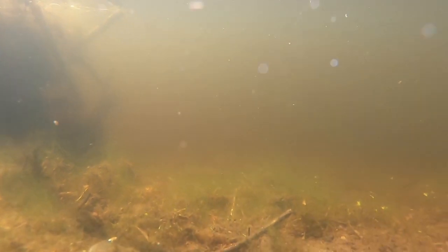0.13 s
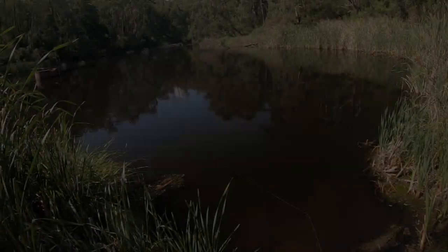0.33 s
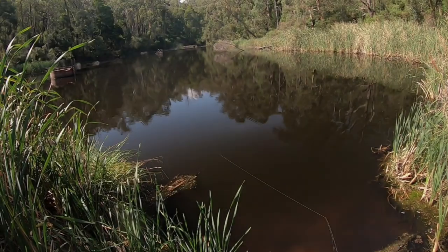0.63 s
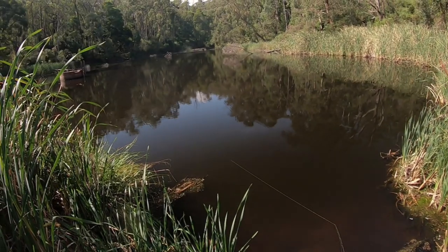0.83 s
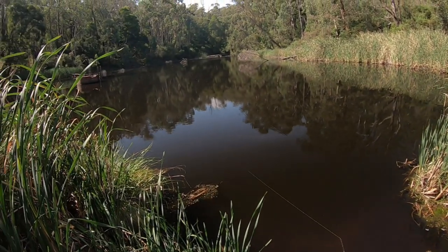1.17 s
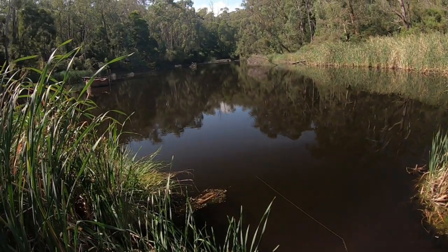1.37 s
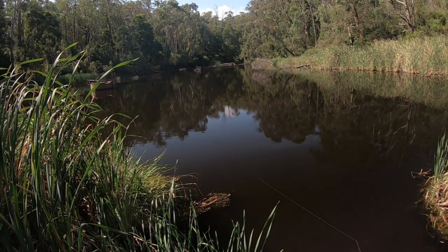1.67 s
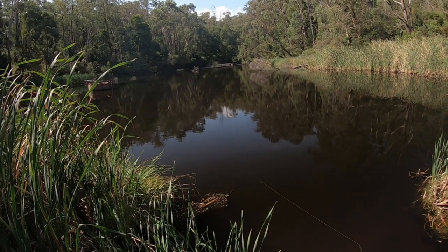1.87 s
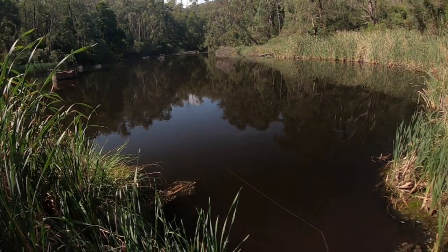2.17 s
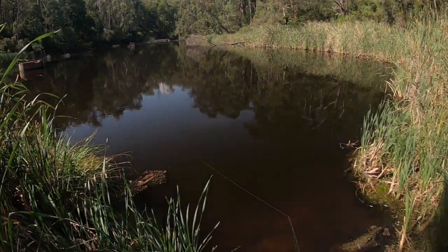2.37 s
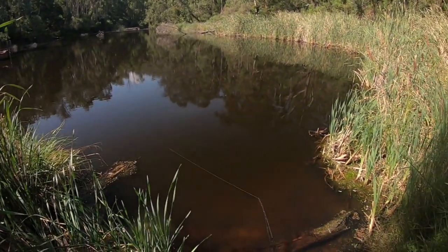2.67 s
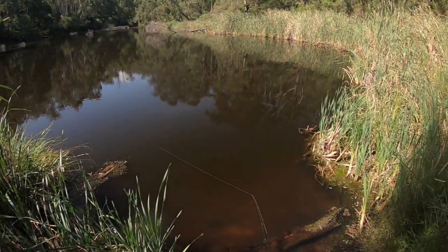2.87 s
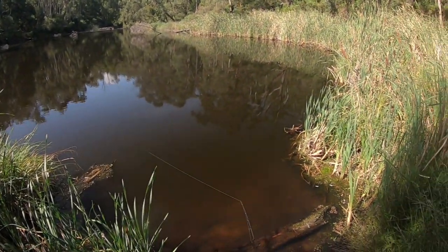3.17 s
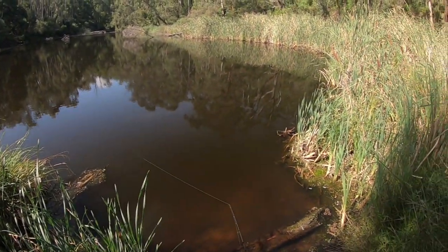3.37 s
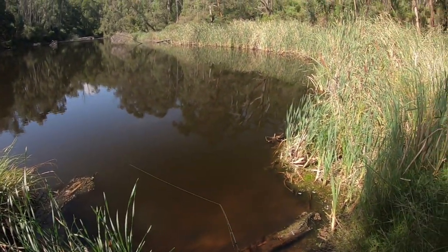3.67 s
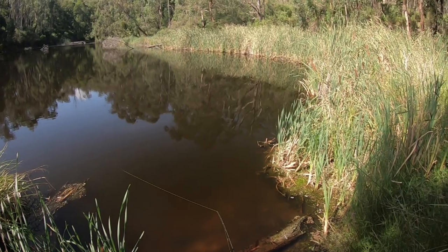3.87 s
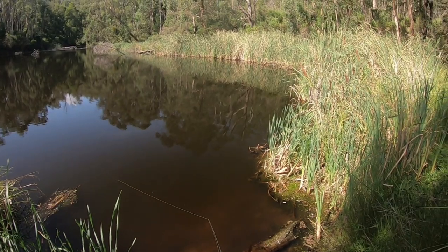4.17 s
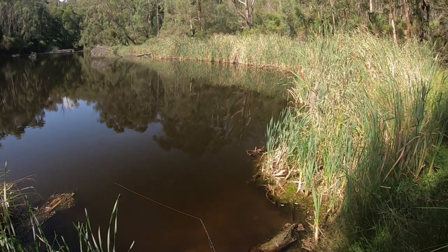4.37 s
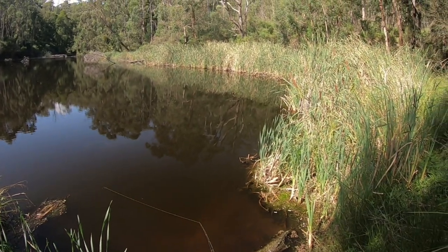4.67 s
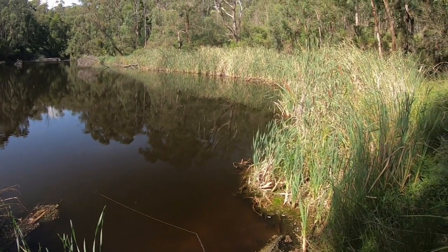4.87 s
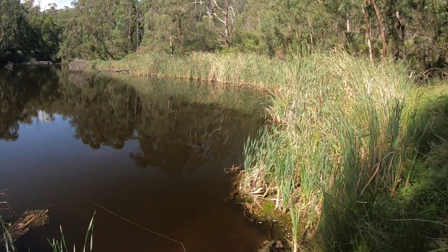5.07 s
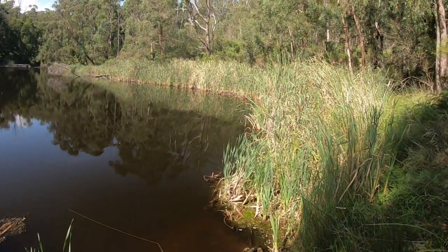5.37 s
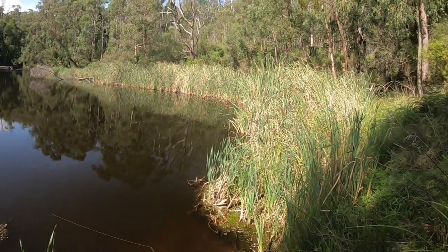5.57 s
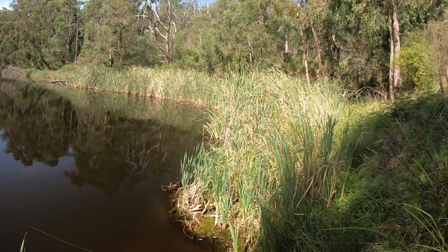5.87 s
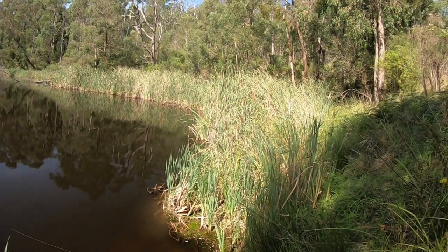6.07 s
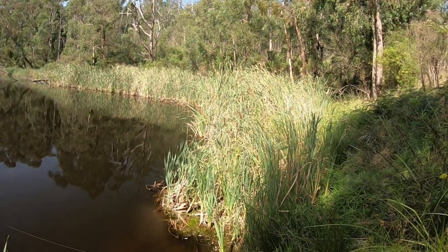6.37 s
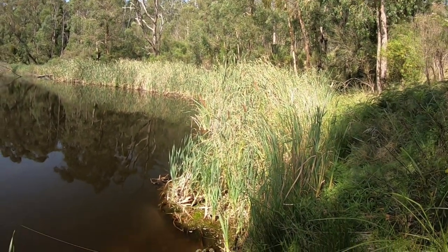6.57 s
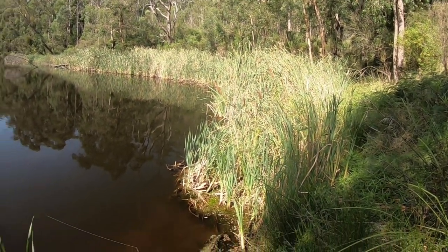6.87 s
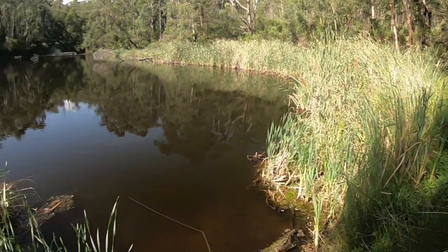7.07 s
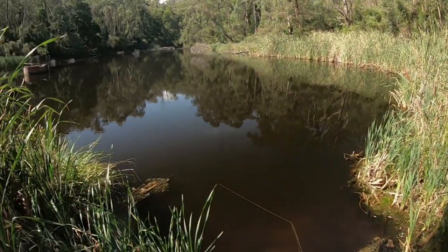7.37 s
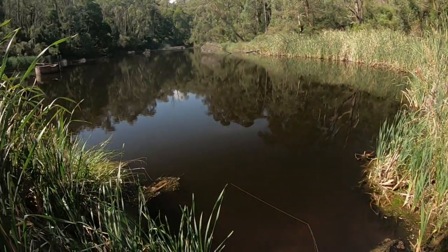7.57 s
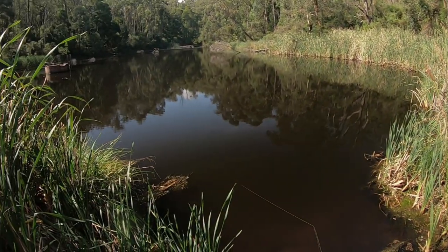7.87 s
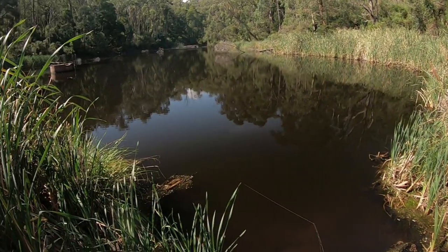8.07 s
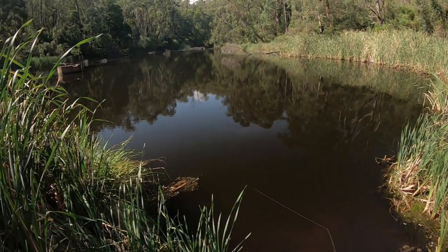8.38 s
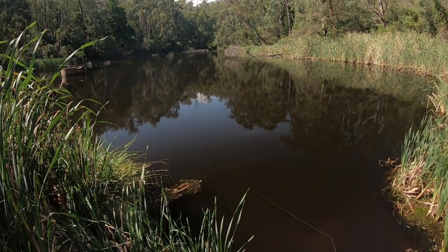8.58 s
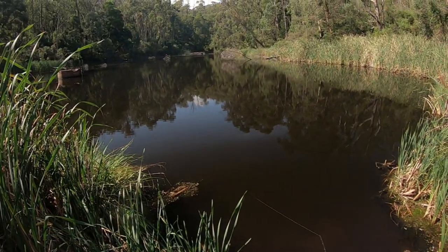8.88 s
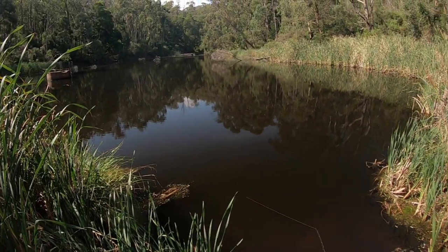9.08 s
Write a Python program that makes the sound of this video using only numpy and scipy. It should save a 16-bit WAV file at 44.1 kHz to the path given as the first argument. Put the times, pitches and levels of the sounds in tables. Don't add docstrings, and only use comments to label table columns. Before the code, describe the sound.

A brief loud underwater rumble with dull knocks cuts off, then a quiet lakeside fades in with cricket trills, small bird chirps and twig snaps.

```python
import sys
import numpy as np
from scipy import signal
from scipy.fft import rfft, irfft, next_fast_len
from scipy.io import wavfile
from scipy.ndimage import uniform_filter1d

SR = 44100
rng = np.random.default_rng(int(sys.argv[2]) if len(sys.argv) > 2 else 0)


def boost_factor(decibels):
    exponent = np.asarray(decibels, float) / 20
    return 10 ** exponent


def wrap_up_sound(samples):
    columns = np.atleast_2d(samples).T
    tamed = np.clip(columns, -1, 1)
    steps = np.round(tamed * 32767).astype(np.int16)
    wavfile.write(sys.argv[1], SR, steps)


N = 406196
T = np.arange(N) / SR

CUT_S, FADE_S = .2195, 0.97
CUT_PRESSURE, START_PRESSURE = -0.019, -0.01
# start_s, level_db
RUMBLE_SWELL = [
    (0, -25),
    (.03, -34),
    (.06, -36),
    (0.099, -34.5),
    (.16, -38.5),
    (.21, -37.5),
]
# pitch_hz, level_db (per Hz)
WATER_COLOUR = [(12, -49), (20, -5.5), (70, -9), (120, -18.5), (190, -18), (263, -32.5), (607, -55.5),
                (828, -68), (1100, -54.5), (1210, -56.5), (6000, -83.5), (7800, -126), (13200, -120)]
# start_s, level_db, pitch_hz, decay_s
THUMPS = [
    (.005, -13, 28, 0.09),
    (0.039, -28, 42, .044),
    (.051, -24.5, 18, 0.33),
    (.117, -26, 68, 0.18),
    (.178, -14.5, 53, 0.061),
]
# start_s, level_db, pitch_hz
KNOCKS = [
    (.0148, -53, 3400),
    (0.0168, -25, 503),
    (0.018, -41, 1500),
    (.0596, -42, 700),
    (.078, -19, 397),
    (.097, -41, 500),
    (.13, -50, 900),
    (.188, -58, 3020),
]
KNOCK_T60_S = 0.0055

# pitch_hz, level_db (per Hz)
CHORUS_COLOUR = [(4000, -41), (5500, -15.5), (6900, -9.5), (7700, -4), (8480, 0.5), (8960, -5.5),
                 (9400, -15), (9900, -22.5), (11700, -27.5), (12200, -58), (17000, -75)]
# start_s, level_db
CHORUS_SWELL = [
    (1.2, -67.5),
    (3.9, -68.5),
    (4.6, -69),
    (7.2, -68.5),
    (8.1, -67.5),
    (9.2, -68.5),
]
CHORUS_PAN_DB = -1.8
# pitch_hz, level_db (per Hz)
AIR_SUM_COLOUR = [(15, -37), (25, -9.5), (49, -14), (111, -17.5), (143, -4), (172, 0.5), (226, -3.5),
                  (341, -10.5), (528, -16.5), (816, -9), (1030, -14.5), (1450, -15), (1750, -19),
                  (2400, -22.5), (3250, -20), (6000, -27), (7800, -57), (13200, -120)]
# pitch_hz, level_db (per Hz)
AIR_DIFFERENCE_COLOUR = [(15, -39), (25, -12.5), (75, -21), (108, -14), (130, -5.5), (157, 0), (392, -10),
                         (579, -10.5), (634, -5), (816, 0), (1000, -8), (1320, -8.5), (2570, -22.5),
                         (4160, -26.5), (6000, -24.5), (7800, -68), (13200, -120)]
AIR_SUM_DB, AIR_DIFFERENCE_DB = -61.5, -59

# third_note_s, last_note_s, level_db, growth_db, pan_db
TRILLS = [
    (.213, 0.624, -70, -3, 7),
    (1.121, 1.554, -72, -3, 13),
    (2.409, 2.845, -67, 3, -2),
    (3.517, 3.951, -62, 1, -5),
    (4.443, 4.81, -62, -2, -2),
    (5.305, 5.732, -59, 0.5, -4),
    (6.224, 6.654, -57, 0, -6),
    (7.206, 7.695, -69, -8, 5),
    (8.181, 8.61, -72, 1, 16),
    (9.103, 9.153, -65, 0, 8),
]
# third_note_s, last_note_s, level_db, growth_db, pan_db
LOW_TRILLS = [
    (7.305, 7.55, -74, 5, -8),
    (7.948, 8.132, -71, 2, -13),
    (8.451, 8.902, -71, -1, -13),
]
TRILL_S, TRILL_HZ, LOW_TRILL_HZ = .062, 7270, 6660

# first_s, last_s, start_level_db, end_level_db, pan_db
FAST_CRICKET = [
    (.326, .72, -62, -62, -2),
    (1.083, 1.33, -65, -65, -3),
    (3.87, 5.117, -65, -61, -3),
    (5.355, 5.907, -63, -61, -8),
    (6.297, 7.313, -62, -67, -9),
]
# first_s, last_s, start_level_db, end_level_db, pan_db
SLOW_CRICKET = [
    (2.367, 3.775, -71, -66.5, 8),
    (3.864, 5.068, -58.5, -58, -8),
    (5.816, 6.276, -62.5, -69, 1),
    (6.368, 7.013, -62, -56.5, -7.5),
    (8.03, 9.14, -62.5, -60, -21),
]
FAST_S, SLOW_S = .0782, .0926
FAST_HZ, SLOW_HZ, EFFORT_HZ_PER_DB = 8880, 9006, 7
RASP_DB_PER_DB = .4

# start_s, length_s, start_hz, end_hz, level_db
FAR_NOTES = [(.87, 0.102, 2000, 2200, -70.5), (1.1, .03, 7150, 7010, -68.5), (1.648, .025, 5350, 4850, -70),
             (4.047, .018, 3750, 3520, -63), (6.69, .03, 5450, 5350, -74), (6.996, .025, 5750, 5680, -72),
             (7.505, .025, 4750, 4550, -69), (7.94, .23, 4600, 5600, -76), (8.069, .025, 3830, 3600, -69),
             (8.83, .06, 5170, 5650, -71), (8.99, .04, 7300, 7100, -67)]
# start_s, length_s, start_hz, end_hz, level_db
LEFT_NOTES = [
    (2.12, .13, 5300, 5300, -83),
    (2.497, .08, 4970, 5090, -84),
    (3.34, .025, 3350, 4300, -71),
    (3.33, .21, 4600, 5600, -76),
    (3.56, .24, 2004, 2025, -75),
    (8.02, .03, 2720, 2800, -75),
    (8.38, .27, 2040, 2030, -84),
]
FAR_PAN_DB, LEFT_PAN_DB = 2, 12
# start_s, pitch_hz, width_hz, level_db
CICADA = (8.98, 7728, 900, -70)

# start_s, pitch_hz, level_db
WHISTLES = [
    [(1.89, 3310, -73), (1.908, 3246, -68), (1.925, 3000, -70), (1.945, 2400, -75)],
    [(1.993, 2600, -76), (2.004, 3300, -66), (2.016, 4200, -76)],
    [(2.28, 4080, -76), (2.346, 4040, -65), (2.392, 3230, -61), (2.446, 2250, -66), (2.462, 2610, -62),
     (2.485, 3170, -76)],
    [(2.69, 3630, -60), (2.702, 3700, -63), (2.72, 2950, -60), (2.742, 2030, -67), (2.756, 2550, -57),
     (2.788, 3250, -53.5), (2.805, 4300, -70)],
    [(2.97, 4540, -66), (2.985, 3200, -62.5), (3.006, 1960, -71), (3.022, 3010, -62), (3.03, 3460, -56),
     (3.042, 3300, -62)],
]
WHISTLE_PAN_DB = -2.5

# start_s, level_db, pitch_hz, decay_s, pan_db
TICKS = [
    (1.985, -59, 6100, .012, 2),
    (2.72, -56, 5500, .004, -8),
    (3.235, -53, 6000, .003, -8),
    (3.3, -51, 3700, .007, 0),
    (3.415, -55, 4900, .003, -8),
]
# pitch_hz, level_db, decay_s
THICK_TWIG = [(1250, 0, .008), (3300, -6, .011), (3900, -7, .011)]
# pitch_hz, level_db, decay_s
THIN_TWIG = [(3450, -2, .007), (4100, -1, .006), (4800, -2, .006), (5600, -5, .005), (6400, -7, .005)]
# start_s, level_db, pan_db
THICK_SNAPS = [
    (3.288, -42, 1),
    (3.291, -41.5, 1),
]
# start_s, level_db, pan_db
THIN_SNAPS = [
    (3.9545, -39.5, -2),
    (3.9573, -45, -2),
]


def walk(rate, size=N):
    hold = int(SR / rate)
    steps = np.repeat(rng.standard_normal(size // hold + 1), hold)
    return 1.04 * uniform_filter1d(steps, hold)[:size]


def shaped(colour, lo, hi, flicker_db, rate, size=N):
    fast = next_fast_len(size, True)
    hz = np.arange(fast // 2 + 1) * SR / fast + 1e-3
    points, dbs = np.transpose(colour)
    gain = boost_factor(np.interp(np.log(hz), np.log(points), dbs))
    spectrum = rfft(rng.standard_normal(fast)) * gain
    place = 2 * np.log2(hz / lo)
    out = 0
    for k in range(int(2 * np.log2(hi / lo)) + 2):
        skirt = np.cos(np.pi / 2 * np.clip(place - k, -1, 1)) ** 2
        band = irfft(spectrum * skirt, fast)[:size]
        out = out + band * (1 + flicker_db / 8.9 * walk(rate, size))
    return out / np.std(out)


def add(out, s, note, db, pan_db, lag=0):
    starts = int(s * SR) + np.array([lag, 0])
    gains = boost_factor(db + np.array([pan_db, -pan_db]) / 2)
    for side, i, gain in zip(out, starts, gains):
        part = note[:max(N - i, 0)]
        side[i:i + len(part)] += gain * part


def tone(hz):
    return np.sin(2 * np.pi * (np.cumsum(hz) / SR + rng.random()))


def ring(hz, t60, cycles=.35):
    t = np.arange(int(t60 * SR) + 8) / SR
    rise = 1 - np.exp(-(t * hz / cycles) ** 2)
    decay = np.exp(-np.log(1000) * t / t60)
    return np.sin(2 * np.pi * hz * t) * decay * rise


def underwater():
    s, db = np.transpose(RUMBLE_SWELL)
    out = np.zeros((2, N))
    rumble = shaped(WATER_COLOUR, 19.9, 6000, 2.5, 30, size=SR)
    add(out, 0, rumble * boost_factor(np.interp(T[:SR], s, db)), 0, 0)
    for s, db, hz, t60 in THUMPS:
        add(out, s, ring(hz, t60), db, 0)
    for s, db, hz in KNOCKS:
        add(out, s, ring(hz, KNOCK_T60_S * (500 / hz) ** 0.33), db, 0)
    cut = int(CUT_S * SR)
    out += (CUT_PRESSURE - out[:, cut:cut + 1]) * np.exp(np.minimum(T - CUT_S, 0) / .006)
    housing = signal.butter(8, 9000, fs=SR, output="sos")
    heard = out * (T < CUT_S) * np.clip(T / .006, 0, 1)
    return signal.sosfilt(housing, heard) + START_PRESSURE * np.exp(-T / .003)


def stroke(top_hz, half_s, sag_hz, beat, rasp_db=-60):
    u = np.linspace(-1, 1, int(2 * half_s * SR))
    hz = top_hz - sag_hz * u ** 2
    beat_phase = 2 * np.pi * 160 * half_s * u + 1.1 * rng.standard_normal()
    wings = tone(hz) * (1 - beat * np.cos(beat_phase))
    rasp = tone(15100 + 1100 * uniform_filter1d(rng.standard_normal(len(u)), size=30))
    return (wings + boost_factor(rasp_db) * rasp) * np.cos(np.pi / 2 * u) ** 1.1


def chorus():
    out = np.zeros((2, N))
    for s, a, b, c in rng.random((600, 4)):
        add(out, s * N / SR, stroke(8250 + 600 * a, .014, 481, 0.34), -11 + 8 * b, 12 * c - 6)
    out += [shaped(CHORUS_COLOUR, 5420, 17000, 0.49, 20) for _ in range(2)]
    s, db = np.transpose(CHORUS_SWELL)
    return out * boost_factor(np.interp(T, s, db) + 3.0 + CHORUS_PAN_DB * np.array([[.5], [-.5]]))


def air_hum():
    mid = boost_factor(AIR_SUM_DB) * shaped(AIR_SUM_COLOUR, 25.04, 6500, 1.48, 12)
    side = boost_factor(AIR_DIFFERENCE_DB) * shaped(AIR_DIFFERENCE_COLOUR, 25, 6500, 1.6, 14)
    return np.array([mid + side, mid - side]) * boost_factor(np.array([[-.3], [.3]]))


def trills(out, rows, hz, low):
    u = np.linspace(0, 1, 760)
    hook = np.abs(u - .2) ** 2 / .64
    swell = np.sin(np.pi * u ** 1.2) ** 0.49
    for first, last, db, grow_db, pan_db in rows:
        count = round((last - first) / TRILL_S) + 1
        times = np.r_[first - .13, first - .066, np.linspace(first, last, count)]
        pitch = hz * np.r_[.925, .965, np.linspace(.99, 1.012, count)]
        growth = grow_db * np.linspace(-.5, .5, count)
        level = db + np.r_[-4 - grow_db / 2, -2.5 - grow_db / 2, growth]
        level += 1.5 * rng.standard_normal(count + 2)
        for s, top, note_db in zip(times, pitch, level):
            add(out, s, tone(top - (top - low * hz) * hook) * swell, note_db, pan_db)


def cricket(out, bouts, period, hz, rasp_db, **shape):
    for first, last, db0, db1, pan_db in bouts:
        count = round((last - first) / period) + 1
        times = np.linspace(first, last, count)
        levels = np.linspace(db0, db1, count)
        for s, db, chance in zip(times, levels, rng.standard_normal((count, 3))):
            late, sharp, loud = chance
            top_hz = hz + EFFORT_HZ_PER_DB * (db + 59) + 25 * sharp
            note = stroke(top_hz, rasp_db=rasp_db - RASP_DB_PER_DB * pan_db, **shape)
            start = s - shape["half_s"] + 0.00075 * late
            add(out, start, note, db + 1.5 * loud, pan_db, lag=2 * int(pan_db < -2))


def far_birds(out):
    flutter_db = 2 * walk(90)
    for notes, pan_db in ((LEFT_NOTES, LEFT_PAN_DB), (FAR_NOTES, FAR_PAN_DB)):
        for s, length, hz0, hz1, db in notes:
            count = int(length * SR)
            air = boost_factor(flutter_db[int(s * SR):][:count])
            note = tone(np.linspace(hz0, hz1, count)) * np.hanning(count) ** .3
            add(out, s, note * air, db, pan_db)
    s, hz, width, db = CICADA
    band = signal.butter(4, [hz - width / 2, hz + width / 2], "band", fs=SR, output="sos")
    buzz = signal.sosfilt(band, rng.standard_normal(N)) * np.clip((T - s) / 0.057, 0, 1)
    add(out, 0, buzz * np.sqrt(SR / 2 / width), db, 2.5)


def whistles(out):
    flutter_db = 2.5 * walk(110)
    waver = 1 + .012 * walk(250)
    for call in WHISTLES:
        s, *columns = np.transpose(call)
        t = np.arange(s[0], s[-1], 1 / SR)
        hz, db = (np.interp(t, s, c) for c in columns)
        start = int(s[0] * SR)
        now = slice(start, start + len(t))
        ends = np.clip(np.minimum(t - s[0], s[-1] - t) / 0.0018, 0, 1)
        glide = tone(uniform_filter1d(hz, size=220) * waver[now])
        add(out, s[0], glide * ends * boost_factor(db + flutter_db[now]), 1.5, WHISTLE_PAN_DB)


def twigs(out):
    wood = np.zeros((2, N))
    for twig, snaps in ((THICK_TWIG, THICK_SNAPS), (THIN_TWIG, THIN_SNAPS)):
        for s, db, pan_db in snaps:
            for hz, mode_db, t60 in twig:
                start = s + .0004 * rng.random()
                add(wood, start, ring(hz, t60, cycles=.9), db + mode_db + 1.5, pan_db)
    for s, db, hz, t60, pan_db in TICKS:
        add(wood, s, ring(hz, t60), db, pan_db)
    return out + signal.sosfilt(signal.butter(6, 8500, fs=SR, output="sos"), wood)


def trees(x, t60, wet_db):
    t = np.arange(int(.5 * SR)) / SR
    trunks = boost_factor(2.5 * rng.exponential(size=(2, len(t))))
    decay = np.exp(-np.log(1000) * t / t60) * np.clip(t / 0.0011, 0, 1)
    tail = rng.standard_normal((2, len(t))) * trunks * decay
    tail *= boost_factor(wet_db) / np.sqrt((tail ** 2).sum(axis=1, keepdims=True))
    return x + signal.fftconvolve(x, tail, axes=1)[:, :N]


def scene():
    close, birds = np.zeros((2, 2, N))
    trills(close, TRILLS, TRILL_HZ, low=.84)
    trills(close, LOW_TRILLS, LOW_TRILL_HZ, low=.9)
    cricket(close, FAST_CRICKET, FAST_S, FAST_HZ, -64, half_s=.014, sag_hz=750, beat=.15)
    cricket(close, SLOW_CRICKET, SLOW_S, SLOW_HZ, -42, half_s=.0165, sag_hz=750, beat=.6)
    far_birds(birds)
    whistles(birds)
    close = twigs(close)
    shore = trees(close, 0.11, -7.5) + trees(birds, 0.3, -2.5) + chorus() + air_hum()
    return underwater() + shore * np.clip((T - CUT_S) / FADE_S, 0, 1)


def band_limit(x):
    return signal.sosfilt(signal.butter(12, 15600, fs=SR, output="sos"), x)


def record(dry):
    return band_limit(dry)


dry = scene()
out = record(dry)
wrap_up_sound(out)
```